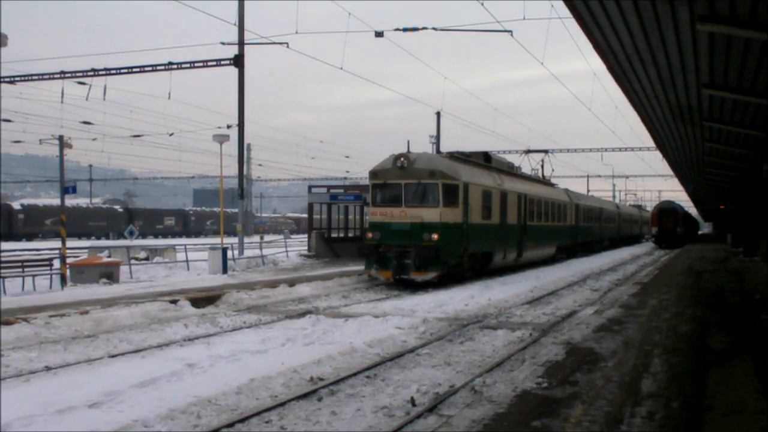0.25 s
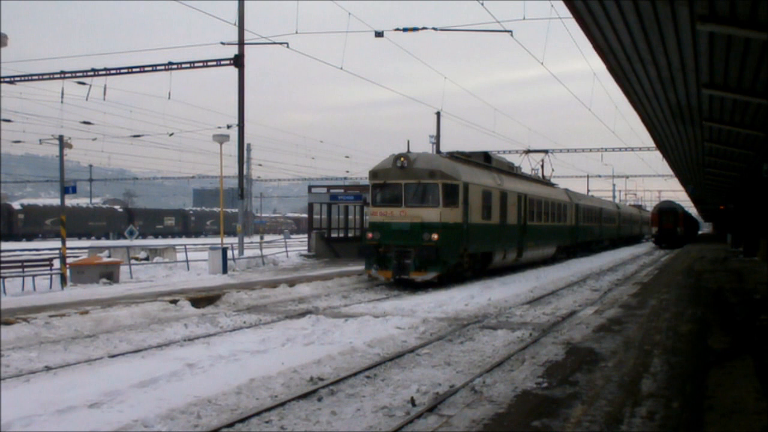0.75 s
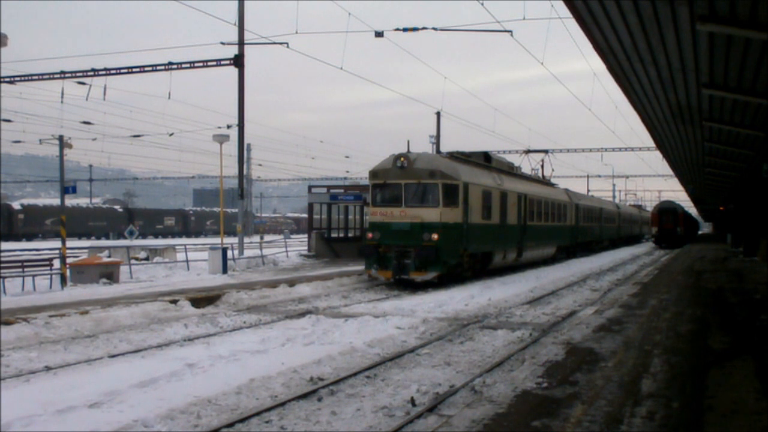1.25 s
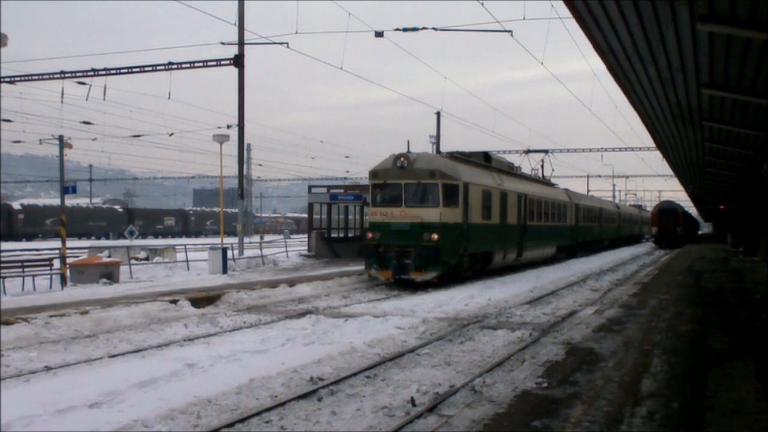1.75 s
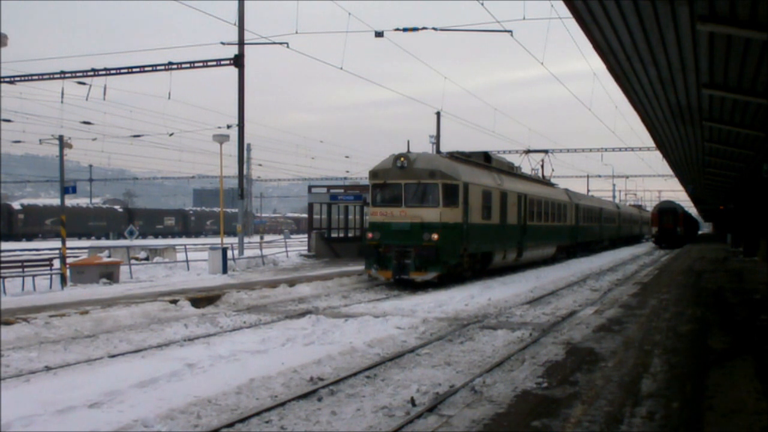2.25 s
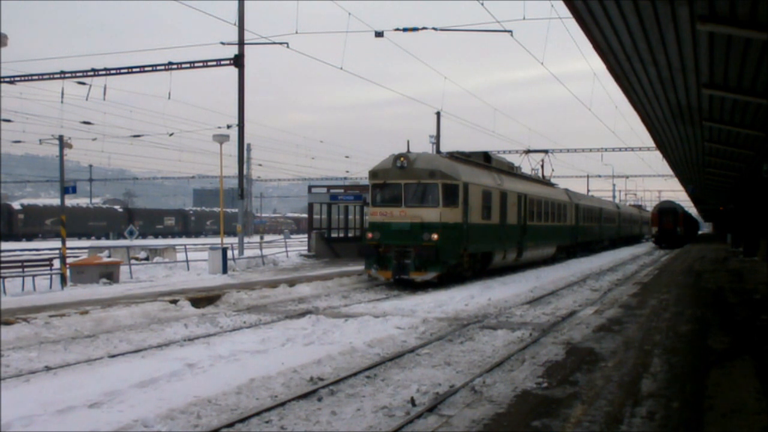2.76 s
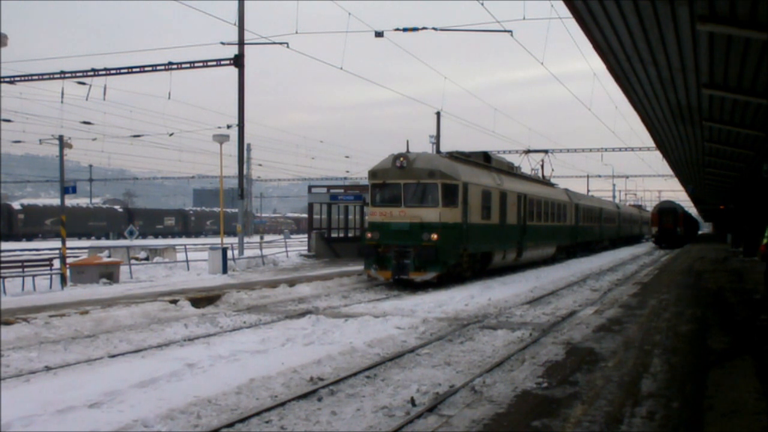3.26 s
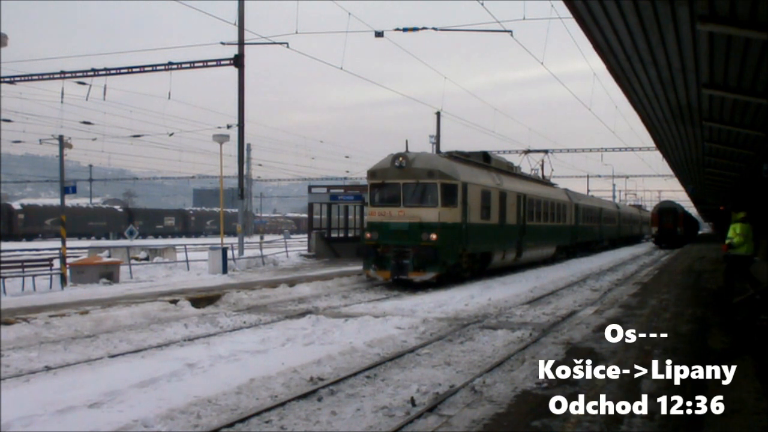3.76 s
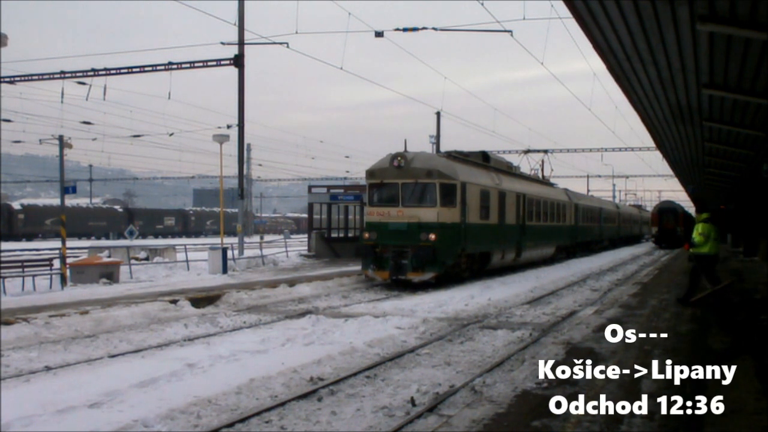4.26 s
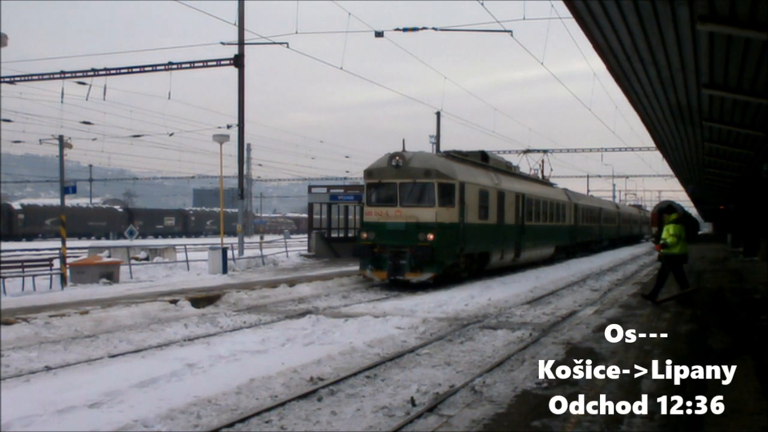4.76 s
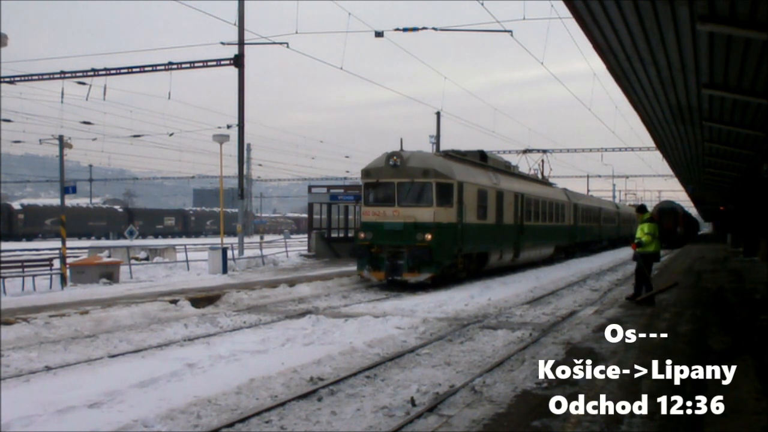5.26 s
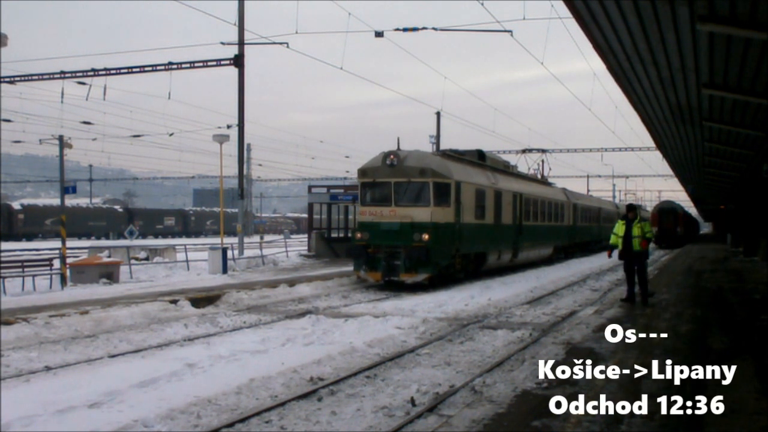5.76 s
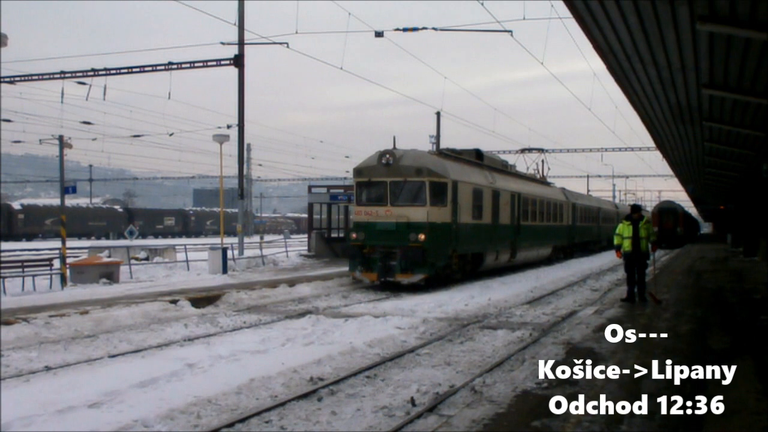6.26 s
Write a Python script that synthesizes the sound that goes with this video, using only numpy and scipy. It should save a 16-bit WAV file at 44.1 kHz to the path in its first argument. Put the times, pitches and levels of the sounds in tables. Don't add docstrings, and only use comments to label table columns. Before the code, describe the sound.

A standing train's blower whines steadily over rushing duct air while boots crunch and knock on gritty ground close by, then only shuffle faintly.

```python
import sys
import numpy as np
from scipy import signal
from scipy.fft import rfft, irfft
from scipy.io import wavfile
from scipy.ndimage import uniform_filter1d

SR = 44100
rng = np.random.default_rng(int(sys.argv[2]) if len(sys.argv) > 2 else 0)


def attenuation_scalar(level_db):
    decades = np.asarray(level_db, float) / 20
    return 10 ** decades


def master(y):
    cut = np.clip(np.atleast_2d(y).T, -1, 1)
    pcm = np.round(cut * 32767)
    wavfile.write(sys.argv[1], SR, pcm.astype(np.int16))


N = 286650


def level(x, db):
    return x * attenuation_scalar(db) / np.sqrt(np.mean(x ** 2))


def curve(table):
    s, *columns = np.transpose(table)
    return [np.interp(np.arange(N) / SR, s, c) for c in columns]


def colour(x, points, peaks=()):
    hz = np.maximum(np.fft.rfftfreq(len(x), 1 / SR), 1)
    points_hz, points_db = np.transpose(points)
    db = np.interp(np.log(hz), np.log(points_hz), points_db)
    for centre_hz, width_hz, gain_db in peaks:
        db = db + gain_db / (1 + (2 * (hz - centre_hz) / width_hz) ** 4)
    return irfft(rfft(x) * attenuation_scalar(db), len(x))


def walk(rate):
    hold = int(SR / rate)
    steps = np.repeat(rng.standard_normal(N // 300 + 1), hold)[:N + hold]
    slewed = uniform_filter1d(uniform_filter1d(steps, hold), hold)
    return 1.18 * slewed[:N]


def grains(length, scatter_db):
    chance = rng.standard_normal(length) * attenuation_scalar(scatter_db * rng.exponential(size=length))
    return chance / chance.std()


def gate(t, start, stop, edge):
    return np.clip(np.minimum(t - start, stop - t) / edge + .5, 0, 1)


def decay(t, t60):
    return np.exp(-np.log(1000) * t / t60)


def blower():
    # (time [s], blade tone frequency [Hz], blade tone level [dB], octave level [dB])
    rotor = [(0.0, 861.7, -23.6, -56), (0.3, 861.8, -23.6, -52.5), (0.7, 861.7, -23.0, -55),
             (1.1, 861.6, -23.5, -52.8), (1.5, 861.6, -23.2, -54.8), (2.0, 861.5, -23.0, -53.3),
             (2.25, 861.6, -22.0, -55.7), (2.6, 860.6, -23.2, -62.5), (3.0, 858.8, -25.2, -58.8),
             (3.35, 858.7, -25.4, -53.5), (3.8, 858.8, -25.0, -57), (4.2, 859.1, -22.8, -62),
             (4.7, 860.9, -22.4, -56), (4.9, 861.5, -24.4, -52), (5.3, 861.5, -24.2, -52),
             (5.55, 860.9, -26.1, -50), (6.0, 860.1, -25.6, -48.5), (6.5, 860.2, -25.8, -57.5)]
    # (shaft order [multiple of shaft rate], level [dB])
    shaft_orders = [(1, -79), (2, -67), (3, -65.5), (4, -58.5), (6, -59), (8, -65), (9, -73), (11, -56.5),
                    (12, -64), (13, -56), (17, -46), (19, -44), (20, -45.5), (21, -46.5), (22, -60),
                    (54, -85)]
    blades = 18
    hz, tone_db, octave_db = curve(rotor)
    turn = 2 * np.pi * np.cumsum(hz) / SR / blades
    tone = attenuation_scalar(tone_db - .2 + .55 * walk(22)) * np.sin(blades * turn + .04 * walk(18))
    octave = attenuation_scalar(octave_db + 1.5 + .8 * walk(15)) * np.sin(2 * blades * turn + .15 * walk(14))
    orders = np.zeros(N)
    for order, db in shaft_orders:
        phase = 1.7 * walk(9) + rng.uniform(0, 2 * np.pi)
        orders += attenuation_scalar(db + 3.5 * walk(9)) * np.sin(order * turn + phase)
    return np.sqrt(2) * (tone + octave + orders)


def duct_air():
    # (frequency [Hz], level [dB per Hz])
    stream = [(120, -26), (250, -18), (360, -16), (620, -11.5), (1150, -16), (1500, -24.5), (2300, -23),
              (3500, -26), (4300, -36.5), (6000, -41), (16000, -72)]
    # (centre [Hz], width [Hz], gain [dB])
    resonances = [(392, 54, 5), (449, 55, 4), (735, 65, 8), (810, 84, 7.5), (871.3, 46, 12),
                  (952, 79, 11.5), (1094, 25, 4), (1039, 62, 6.5), (1725, 196, 6.5), (2046, 190, 4),
                  (2500, 180, 1), (1260, 46, 1.5), (2347, 85, -4), (2830, 140, 1.5), (332, 34, 2),
                  (634, 75, -3), (3980, 150, 0.5)]
    air = level(colour(rng.standard_normal(N), stream, resonances), -30.5)
    return air * attenuation_scalar(0.2 * walk(9))


def compressor():
    # (frequency [Hz], level [dB])
    hum_tones = [(64.7, -63), (486.5, -52), (878, -45)]
    t = np.arange(N) / SR
    hums = np.zeros(N)
    for hz, db in hum_tones:
        hums += attenuation_scalar(db + 3.0 * walk(7)) * np.sin(2 * np.pi * hz * t + 1.3 * walk(8))
    return np.sqrt(2) * hums


def groan():
    start_s, length_s, sag_at_s = 2.52, 0.5, 2.66
    t = np.arange(N) / SR
    hz = 268.6 - 19.3 * gate(t, sag_at_s, 99, .09)
    swell = attenuation_scalar(-49) * gate(t, start_s, start_s + length_s, .05)
    return np.sqrt(2) * swell * np.sin(2 * np.pi * np.cumsum(hz) / SR)


def canopy(dry):
    t60_s, return_db = 0.68, -12
    t = np.arange(SR // 2) / SR
    tail = rng.standard_normal(len(t)) * decay(t, t60_s)
    wet = signal.fftconvolve(dry, tail / np.sqrt(np.sum(tail ** 2)))[:N]
    return dry[:N] + attenuation_scalar(return_db) * wet


def boots():
    # (time [s], peak level [dB], ringing frequency [Hz], broad share [dB])
    crunches = [(.006, -27.5, 6300, 7), (.026, -37, 6400, 7), (0.078, -35, 6300, 8.5),
                (.087, -34, 6800, -6), (.093, -38, 7200, 14), (.183, -38, 11000, -6), (.208, -39, 3280, 7),
                (.265, -38, 7000, 8), (.602, -31, 5640, 1.5), (.605, -25, 6500, 0), (.615, -37.5, 7800, 12),
                (.621, -33, 6100, -12), (.654, -37, 5600, -12), (0.7147, -21, 5970, -6),
                (.729, -23, 6460, -11), (.7335, -18, 5670, -2), (0.737, -30, 6800, 3.5),
                (.799, -36, 5600, -11), (1.325, -36, 5400, 4), (1.644, -39, 6220, -10),
                (1.812, -32.5, 6640, -5), (1.86, -42, 5800, 6), (2.416, -34.5, 7100, 0),
                (2.656, -44, 9000, -1), (3.564, -43.5, 9000, 12), (4.444, -40, 6790, -8),
                (4.999, -43, 6310, -8), (5.389, -43, 6800, -6), (6.105, -33, 7000, -7),
                (6.355, -41, 5800, -6)]
    rise_ms, crumble_t60_s = 1.7, 0.068
    snap_above_db, snap_shorter = -26.5, 0.7
    dry, t = np.zeros(N + SR), np.arange(SR // 4) / SR
    swell = np.clip(1000 * t / rise_ms, 0, 1)
    for s, peak_db, hz, broad_db in crunches:
        t60 = crumble_t60_s * attenuation_scalar(-snap_shorter * max(peak_db - snap_above_db, 0))
        burst = grains(len(t), 3) * swell * decay(t, t60)
        band = signal.butter(2, [.86 * hz, 1.14 * hz], "band", fs=SR, output="sos")
        ring = signal.sosfilt(band, burst)
        dry[int(s * SR):][:len(t)] += attenuation_scalar(peak_db) * (1.96 * ring + .5 * attenuation_scalar(broad_db) * burst)
    return colour(canopy(dry), [(500, -1), (2000, 6), (6000, -3.5), (11000, -4), (16000, -15)])


def soles():
    # (start [s], length [s], level [dB], extra treble [dB], fade t60 [s])
    drags = [(0, .04, -41.5, -5, 0.43), (.08, .04, -42.5, 0, 0.5), (0.24, 0.053, -48.5, -2, .4),
             (.65, .06, -47, -5, .4), (0.745, 0.075, -45, 3, .5), (1.17, 0.09, -57, 0, .4),
             (1.32, .15, -56, 1, .5), (1.645, .05, -53.5, -7, .3), (1.81, .06, -53, -4, .4),
             (2.08, .25, -54, 0, .5), (2.422, .04, -48.5, 2, .4), (2.52, .12, -55, 2, .6),
             (3.2, .05, -55, 0, .4), (3.6, 0.11, -53, 0, .3), (3.72, 0.17, -49, 1, .12),
             (4.1, 0.38, -57, -1, .6), (4.85, .1, -54, -2, .4), (4.973, 0.08, -49, 1, 0.44),
             (5.1, .3, -53, 2, .6), (5.62, 0.45, -52, 2.5, .5), (6.09, .2, -53, 2, .4),
             (6.373, 0.094, -46, 1, .3)]
    # (frequency [Hz], level [dB per Hz])
    grit_spectrum = [(1500, -15), (3000, 1), (5000, -6.5), (6600, -1.5), (8200, -9), (10500, -10),
                     (12000, -19.5), (16000, -19)]
    rise_s = 0.036
    t = np.arange(N) / SR
    shuffle = attenuation_scalar(2 * -55.5)
    body_power, treble_power = shuffle, shuffle
    for s, length, db, treble_db, t60 in drags:
        rise = np.clip((t - s) / rise_s + 1, 0, 1)
        fade_db = 60 * np.maximum(t - s - length, 0) / t60
        power = (attenuation_scalar(db - fade_db) * rise) ** 2
        body_power = body_power + power
        treble_power = treble_power + power * attenuation_scalar(2 * treble_db)
    grit = level(colour(grains(N, 1.6), grit_spectrum), 0)
    treble = signal.sosfilt(signal.butter(4, 8200, "high", fs=SR, output="sos"), grit)
    scrape = (grit - treble) * np.sqrt(body_power) + treble * np.sqrt(treble_power)
    return scrape * attenuation_scalar(1.64 * walk(25.13))


def heels():
    # (time [s], peak level [dB], share of the high pair of modes [0-1])
    strikes = [
        (.008, -33, 0.46),
        (.027, -24, .3),
        (.079, -29, 0.28),
        (.091, -40, .2),
        (0.7143, -20.5, 0.79),
        (0.7354, -26, .4),
    ]
    # (frequency [Hz], level [dB], t60 [s])
    modes = [(1400, -4, .04), (2020, 1, .06), (2850, -2, .04), (3400, -1, .05), (3820, -3, .09),
             (3910, -3, .1)]
    out, t = np.zeros(N), np.arange(SR // 5) / SR
    ring = [attenuation_scalar(db) * np.sin(2 * np.pi * hz * t) * decay(t, t60) for hz, db, t60 in modes]
    low_modes, high_pair = sum(ring[:-2]), sum(ring[-2:])
    for s, peak_db, high in strikes:
        out[int(s * SR):][:len(t)] += attenuation_scalar(peak_db - 12.5) * (low_modes + high * high_pair)
    return out


def yard():
    # (frequency [Hz], level [dB per Hz])
    rumble = [(15, -11), (22, -21), (31, -6), (48, 2.5), (70, -2.5), (110, -6.5), (200, -2), (400, -25),
              (1000, -40)]
    return level(colour(rng.standard_normal(N), rumble), -52.5) * attenuation_scalar(.8 * walk(1.74))


def scene():
    train = blower() + duct_air() + compressor() + groan()
    feet = boots() + soles() + heels()
    return (train + feet + yard())[None]


def amplifier_hiss():
    # (frequency [Hz], level [dB per Hz])
    hiss_spectrum = [(3000, -10), (8000, -2), (10000, -4), (12500, -4), (14000, -7), (16000, -8.5)]
    bells = [(10600, 500, 4.9), (8700, 400, 2.5)]
    return level(colour(rng.standard_normal(N), hiss_spectrum, bells), -57)


def screen_scan():
    dips = [(.26, .58, .17), (.26, .38, .2), (.465, .58, .29), (.9, 1.6, .08), (-.4, .64, .08)]
    scan_hz, field_hz, edge = 14946.86, 56.941, .025
    t = np.arange(N) / SR
    place = t * field_hz % 1
    field = 1.08 - sum(depth * gate(place, a, b, edge) for a, b, depth in dips)
    return np.sqrt(2) * attenuation_scalar(-48) * field * np.sin(2 * np.pi * scan_hz * t)


def band_limit(x):
    return signal.sosfilt(signal.butter(12, 15680, fs=SR, output="sos"), x)


def record(dry):
    port = [(4580, 490, -6.0), (8100, 500, 0.0), (10800, 210, -1.5)]
    heard = colour(dry[0], [(20, 0.0086), (20000, 0.013)], port)
    offset = 0.0012
    mix = heard + amplifier_hiss() + screen_scan() + offset
    return band_limit(mix[None])


dry = scene()
out = record(dry)
master(out)
```